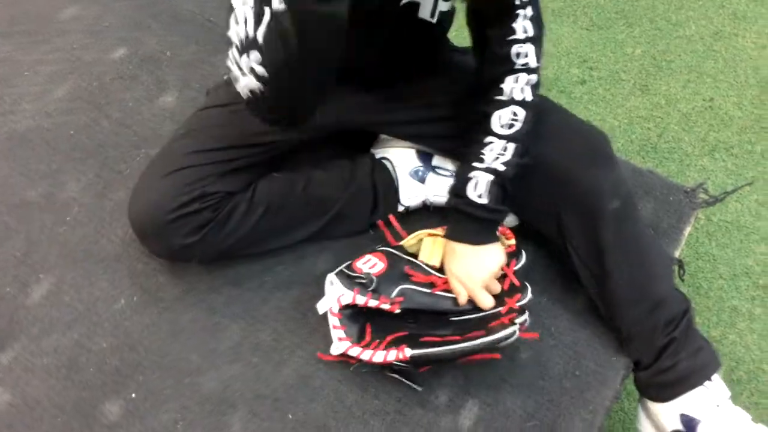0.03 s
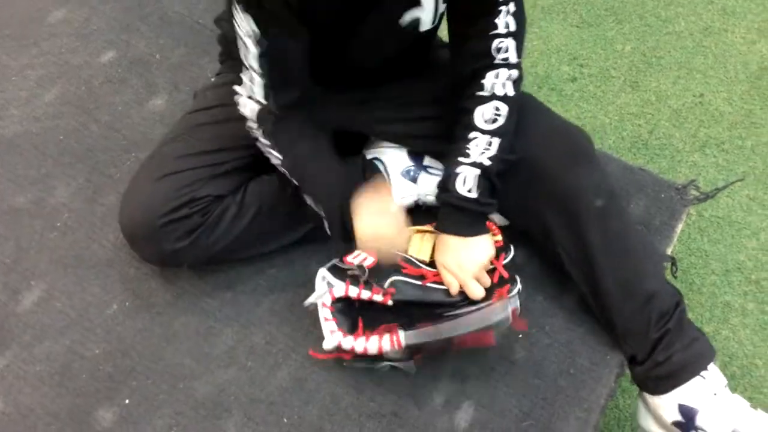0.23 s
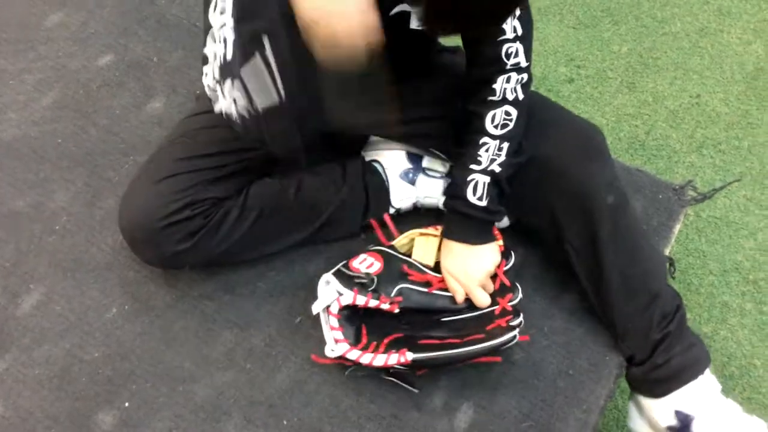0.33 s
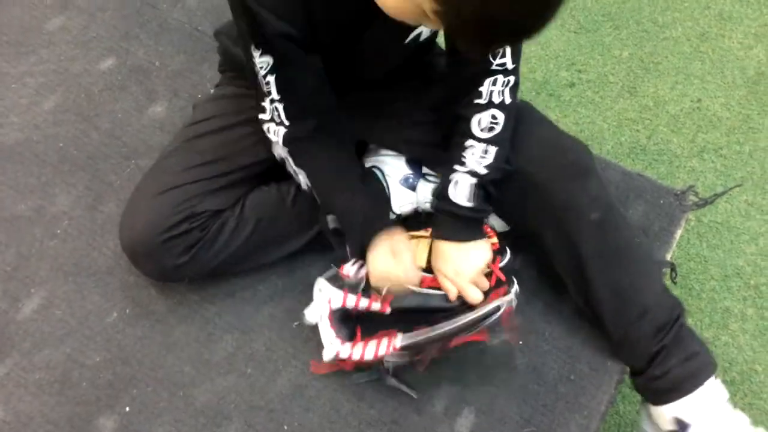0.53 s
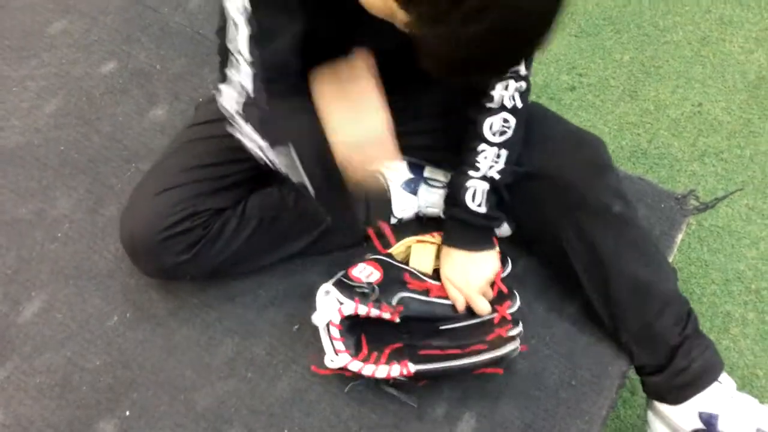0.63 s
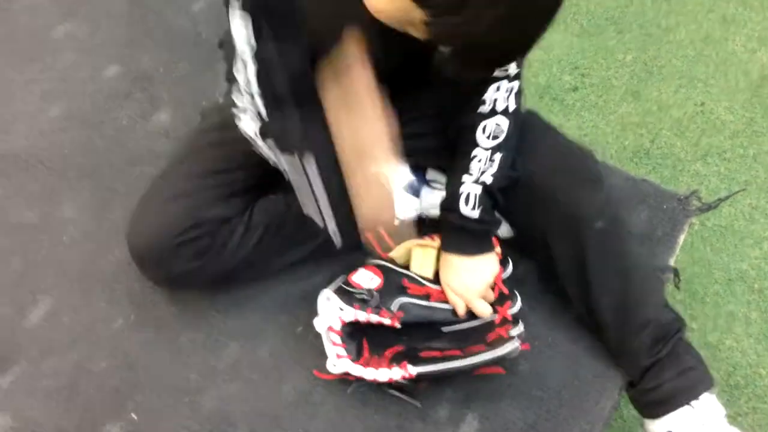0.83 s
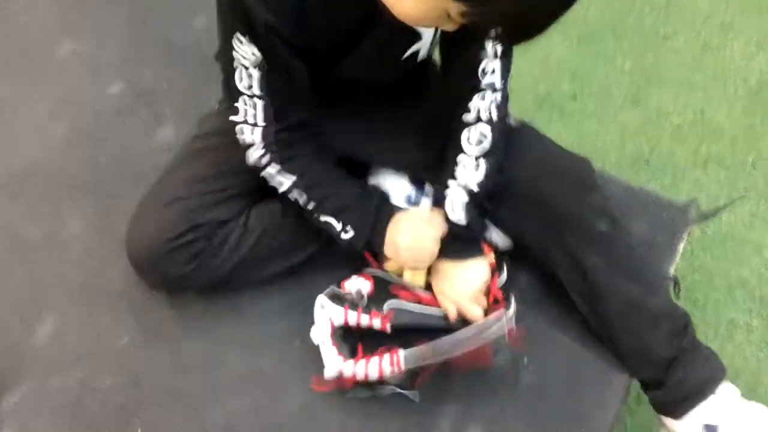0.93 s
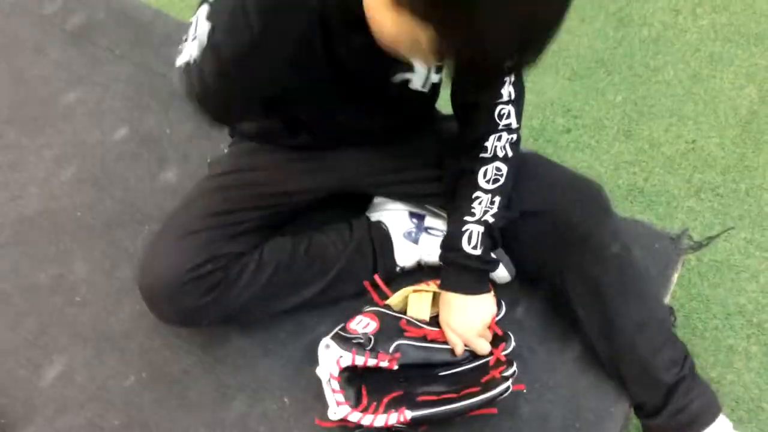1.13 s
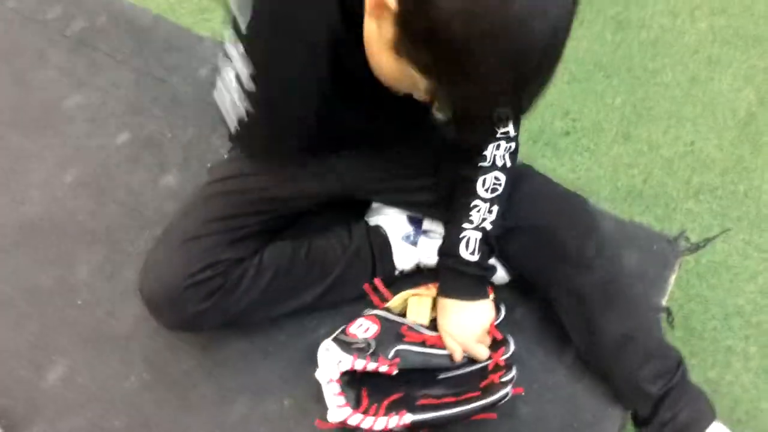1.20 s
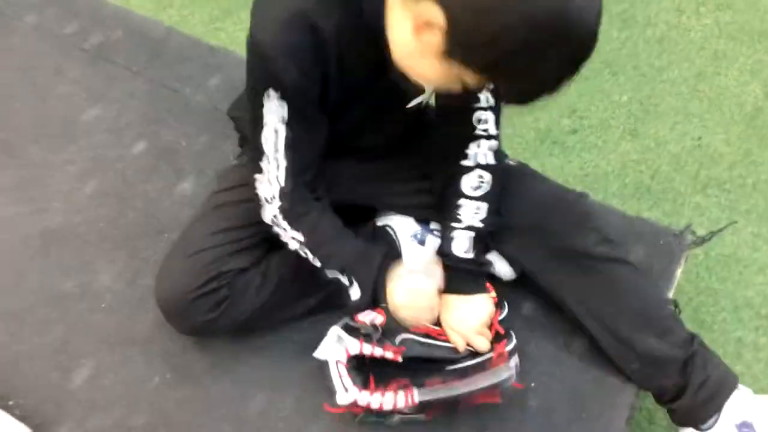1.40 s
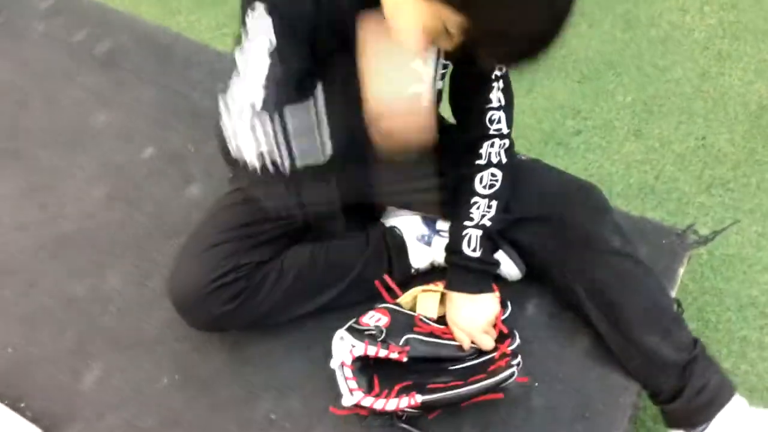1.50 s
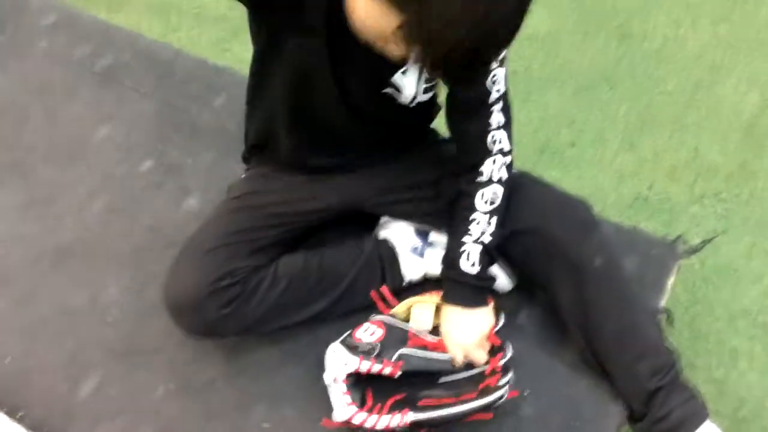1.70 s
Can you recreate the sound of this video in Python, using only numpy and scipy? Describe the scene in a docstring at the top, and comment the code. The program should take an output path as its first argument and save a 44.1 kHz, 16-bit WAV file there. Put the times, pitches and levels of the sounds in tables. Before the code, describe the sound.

Four sharp, evenly paced thumps sound nearby as a hand punches a leather glove lying on a mat in an indoor practice room. The floor booms briefly under each blow, while clothing swishes faintly and ventilation rumbles softly.

```python
"""Low ventilation rumble and a faint sleeve swish, then a fist pounds a leather baseball glove four times.
The glove lies on a rubber mat in an indoor practice room. Each blow smacks the leather and pushes out
a thump of air; a few ms later the pocket claps against the mat. The floor booms with a falling tone,
leather creaks, laces tick, the body bumps softly on the mat, and the room answers."""
import sys
import numpy as np
from scipy import signal
from scipy.fft import rfft, irfft
from scipy.io import wavfile
from scipy.ndimage import uniform_filter1d

SR = 44100
rng = np.random.default_rng(int(sys.argv[2]) if len(sys.argv) > 2 else 0)


def log_audio(samples):
    """Write samples as a 16-bit WAV file to the path given in sys.argv[1]."""
    # one column per channel
    frames = np.atleast_2d(samples).T
    # limit to full scale, then quantise
    limited = np.clip(frames, -1, 1)
    pcm = np.round(limited * 32767).astype(np.int16)
    wavfile.write(sys.argv[1], SR, pcm)


N = 77175

# skin on leather, leather on mat: start_s, level_db, rise_s, treble_db
CONTACTS = [(0.2274, -18, .0004, -3), (0.2339, -17, .0006, -1), (0.5728, -22, .0006, 0),
            (0.5786, -21, .0006, 0), (0.9390, -13.5, .0006, -3), (0.9442, -25, .0004, 1),
            (1.3859, -23, .0007, -4), (1.3915, -14, .00035, 2.5)]
# leather resonances: pitch_hz, level_db, t60_s
LEATHER_MODES = [(475.4, -3.5, 0.05), (712.6, 3, 0.017), (985, -4, 0.022), (1530, -0.5, 0.011),
                 (2820, -7.5, 0.009), (4050, -25, 0.0025)]


def undb(db):
    """Decibels to gain."""
    return 10 ** (np.asarray(db) / 20)


def since(start_s):
    """Seconds since start, zero before it."""
    return np.maximum(np.arange(N) / SR - start_s, 0)


def swell(t, rise_s, shape=1):
    """Peaks at 1 after rise_s, then decays; higher shape is more compact."""
    return (t / rise_s * np.exp(1 - t / rise_s)) ** shape


def colour(x, points):
    """Minimum-phase filter through (freq_hz, gain_db) points; keeps white-noise power."""
    hz, db = np.array(points, float).T
    size = 2 * N
    log_hz = np.log(np.fft.rfftfreq(size, 1 / SR) + 1)
    gain = undb(np.interp(log_hz, np.log(hz), db))
    cepstrum = irfft(np.log(gain / np.sqrt(np.mean(gain ** 2))))
    cepstrum[1:N] *= 2
    cepstrum[N + 1:] = 0
    return irfft(rfft(x, size) * np.exp(rfft(cepstrum)))[:N]


def ring(t, modes):
    """Struck, decaying modes."""
    return sum(undb(db) * np.sin(2 * np.pi * hz * t) * np.exp(-np.log(1000) * t / t60_s)
               for hz, db, t60_s in modes)


def thump(t, hz, rise_s, shape):
    """Heavily damped swing of a few cycles."""
    return np.sin(2 * np.pi * hz * t) * swell(t, rise_s, shape)


def fade(t, t60_s, build_s=0.0026):
    """Unit-energy reverb envelope."""
    envelope = (1 - np.exp(-t / build_s)) * np.exp(-np.log(1000) * t / t60_s)
    return envelope / np.linalg.norm(envelope)


def ventilation(rumble_db=-40.5, whine_hz=9750, whine_db=-83):
    """Steady rumble, very faint whine."""
    # air noise spectrum: freq_hz, gain_db
    spectrum = [(25, -34), (45, -7.5), (65, 2.5), (100, -1), (180, -2), (280, -8.5), (450, -13.5),
                (750, -23.5), (1100, -21.5), (1800, -31), (2300, -38), (5000, -46), (9000, -53),
                (15000, -54.5)]
    rumble = undb(rumble_db) * colour(rng.standard_normal(N), spectrum)
    return rumble + undb(whine_db) * np.sin(2 * np.pi * whine_hz * since(0))


def sleeve_swishes():
    """Cloth rubs as the arm swings."""
    # arm swings: centre_s, half_width_s, level_db
    swings = [(0.09, 0.013, -54), (0.22, 0.0071, -47.5), (0.562, .01, -50), (0.933, 0.011, -48.5),
              (1.3, 0.1, -53.5), (1.382, 0.0075, -43), (1.728, 0.03, -53.5)]
    # cloth spectrum: freq_hz, gain_db
    spectrum = [(100, 12), (1000, 15.5), (4000, -6.5), (9000, -10.5), (16000, -21)]
    envelope = sum(undb(db) * np.exp(-((since(0) - centre_s) / half_width_s) ** 2)
                   for centre_s, half_width_s, db in swings)
    return envelope * colour(rng.standard_normal(N), spectrum)


def crack(start_s, level_db, rise_s, treble_db, scuff_db=-13, scuff_s=0.0022, shelf_hz=4000):
    """Light scuff and sharp crack of contact."""
    # smack spectrum: freq_hz, gain_db
    spectrum = [(100, -6), (600, 0), (1400, 2), (2200, -1), (3300, -2), (4600, -5.5), (6500, -9),
                (8200, -16), (11000, -14.5), (14000, -21), (16000, -23)]
    tilted = [(hz, db + treble_db * hz / (hz + shelf_hz)) for hz, db in spectrum]
    scuff = undb(scuff_db) * np.exp(-((since(0) - start_s) / scuff_s) ** 2)
    envelope = swell(since(start_s), rise_s) + scuff
    return undb(level_db) * colour(rng.standard_normal(N) * envelope, tilted)


def creak(gain_db=-17.5, grain_spread_db=7.5):
    """Leather crinkles as it springs back after each contact."""
    # crinkle spectrum: freq_hz, gain_db
    spectrum = [(300, 14.5), (1500, -1), (4000, -9.5), (8000, -3), (12000, -12), (16000, -12)]
    grains = rng.standard_normal(N) * undb(grain_spread_db * (rng.exponential(size=N) - 3))
    strain = sum(undb(db + gain_db) * swell(since(start_s), rise_s=0.0033)
                 for start_s, db, _, _ in CONTACTS)
    return colour(grains * strain, spectrum)


def fist(start_s, thump_db, thump_hz, ring_db):
    """Pocket pushed in; leather and glove body ring briefly."""
    # glove body and mat: pitch_hz, level_db, t60_s
    body_modes = [(153, -46.5, 0.03), (228.8, -22.5, 0.12), (380, -15.5, 0.046)]
    t = since(start_s)
    push = thump(t, thump_hz, rise_s=0.0022, shape=4.3) + ring(t, body_modes)
    return undb(thump_db) * push + undb(ring_db) * ring(t, LEATHER_MODES)


def floor_boom(start_s, boom_db, fall_db, from_hz=193.3, to_hz=79.3, glide_s=0.06):
    """Floor swings low under the blow; an unsteady tone sinks as it fades."""
    t = since(start_s)
    boom = thump(t, hz=73.4, rise_s=0.011, shape=1.2)
    window = int(0.0074 * SR)
    slow_noise = uniform_filter1d(uniform_filter1d(rng.standard_normal(N), window), window)
    flutter = 1 + 0.32 * np.sqrt(window) * slow_noise
    cycles = to_hz * t + (from_hz - to_hz) * glide_s * (1 - np.exp(-t / glide_s))
    fall = flutter * np.sin(2 * np.pi * cycles) * swell(t, rise_s=0.028)
    return undb(boom_db) * boom + undb(fall_db) * fall


def room_response(ceiling_db=-7.5, ceiling_s=0.0249, spread_s=0.0073, hall_t60_s=2.4, damp_hz=3370):
    """Ceiling echoes, short diffuse tail, faint hall ring that dies sooner in the treble."""
    # reverb bands: centre_hz, level_db, t60_s, hall_db
    bands = [(59, -3, 0.32, 2), (162, 4, 0.37, -15), (324, -4.5, 0.34, -4.5), (720, 0, 0.32, -6),
             (1560, 1, 0.31, -9), (2780, -3.5, 0.37, -15.5), (5750, -0.5, 0.37, -17),
             (12000, -2.5, 0.27, -22)]
    t = since(0)
    noise = rfft(rng.standard_normal(N))
    log_hz = np.log(np.fft.rfftfreq(N, 1 / SR) + 1)
    log_centres = np.log([row[0] for row in bands])
    ceiling = undb(ceiling_db) * np.exp(-((t - ceiling_s) / spread_s) ** 2) / np.sqrt(spread_s * SR)
    out = 0
    for share, (hz, db, t60_s, hall_db) in zip(np.eye(len(bands)), bands):
        band = irfft(noise * np.interp(log_hz, log_centres, share), N)
        hall = undb(hall_db) * fade(t, hall_t60_s / (1 + hz / damp_hz))
        tail = np.hypot(fade(t, t60_s), hall)
        out = out + undb(db) * band * np.hypot(tail, ceiling)
    return out


def clap(start_s, thump_db, thump_hz, ring_db, pop_db):
    """Mat stops the leather: reverse thump, pop of trapped air."""
    # air in the pocket: pitch_hz, level_db, t60_s
    pocket_modes = [(711, -0.5, 0.02), (1426, 0.5, 0.0071), (1750, -18, 0.015)]
    t = since(start_s)
    stop = undb(thump_db) * thump(t, thump_hz, rise_s=0.0019, shape=4.3)
    pop = undb(pop_db) * ring(t, pocket_modes)
    return undb(ring_db) * ring(t, LEATHER_MODES) - stop - pop


def lace_ticks():
    """Laces and loose leather flick."""
    # flicks: start_s, level_db
    flicks = [(0.3193, -64), (0.471, -72), (0.4975, -68), (0.569, -31.5), (0.6032, -33), (0.6694, -49.5),
              (1.417, -27)]
    # tick spectrum: freq_hz, gain_db
    spectrum = [(200, 15.5), (1500, 11), (5000, 6.5), (8500, -4.5), (13000, -10), (16000, -24)]
    envelope = sum(undb(db) * swell(since(start_s), rise_s=0.001) for start_s, db in flicks)
    return colour(rng.standard_normal(N) * envelope, spectrum)


def mat_bumps():
    """Body bumps softly on the mat."""
    # bumps: start_s, pitch_hz, level_db
    bumps = [(0.325, 96, -24.5), (0.518, 67.5, -39), (1.693, 94.6, -23)]
    return sum(undb(db) * thump(since(start_s), hz, rise_s=0.012, shape=6) for start_s, hz, db in bumps)


def scene(floor_send_db=-10):
    """Four blows over the rumble; the room returns thumps as a hum, cracks as an even spray."""
    # fist on leather: start_s, thump_db, thump_hz, ring_db, boom_db, fall_db, send_db, spray_db
    blows = [(0.2276, -1, 302, -14.5, -15, -26.5, -13, -6), (0.573, -.5, 311, -18, -20.5, -28.5, -13, -11),
             (0.9398, -0.5, 304, -17.5, -21, -26, -9, -4.5), (1.3858, -9.5, 296, -25, -11, -18.5, -2, 2.5)]
    # pocket on mat: start_s, thump_db, thump_hz, ring_db, pop_db
    claps = [(0.2344, -4.5, 284, -17.5, -14.5), (0.5798, -5.5, 329, -14.5, -4),
             (0.9444, -11, 425, -14, -14.5), (1.3918, -7, 296, -17, -18.5)]
    # crack spectrum sent to the room: freq_hz, gain_db
    spray_spectrum = [(300, -45), (700, 21.5), (1000, 4.5), (2000, 7.5), (4500, 1), (7000, -8.5),
                      (10000, -13.5), (13000, -16.5), (16000, -23)]
    out = ventilation() + lace_ticks() + sleeve_swishes() + mat_bumps() + creak()
    out += sum(crack(*row) for row in CONTACTS)
    for blow, landing in zip(blows, claps):
        start_s, thump_db, thump_hz, ring_db, boom_db, fall_db, send_db, spray_db = blow
        glove = fist(start_s, thump_db, thump_hz, ring_db) + clap(*landing)
        boom = floor_boom(start_s, boom_db, fall_db)
        spray = colour(signal.unit_impulse(N, int(landing[0] * SR)), spray_spectrum)
        send = undb(send_db) * glove + undb(floor_send_db) * boom + undb(spray_db) * spray
        out += glove + boom + signal.fftconvolve(send, room_response())[:N]
    return out[None]


def record(dry):
    """Full-scale clip, then steep low-pass."""
    cutoff_hz = 15300
    lowpass = signal.ellip(8, .2, 80, cutoff_hz, fs=SR, output="sos")
    return signal.sosfilt(lowpass, np.clip(dry, -1, 1))


dry = scene()
out = record(dry)
log_audio(out)
```